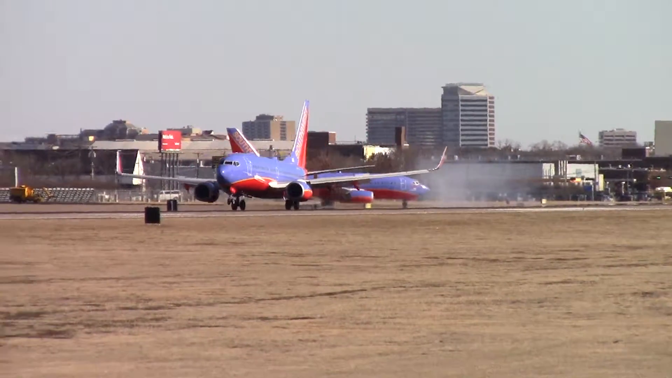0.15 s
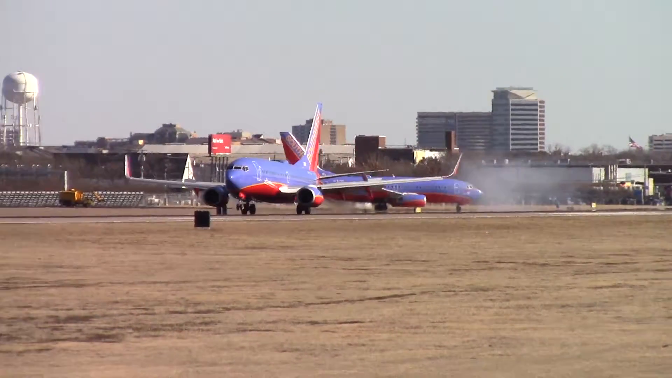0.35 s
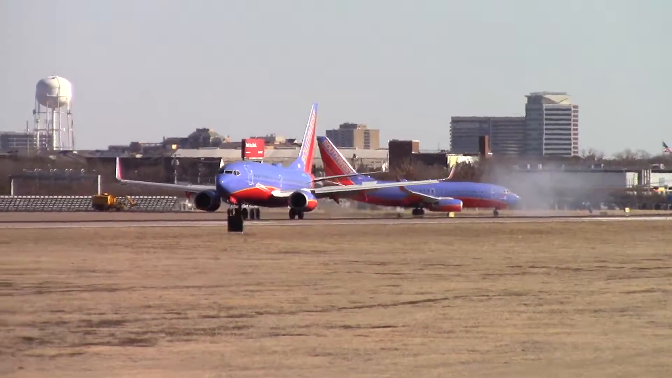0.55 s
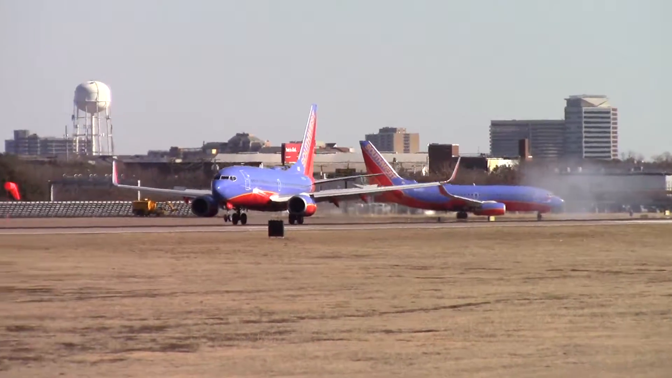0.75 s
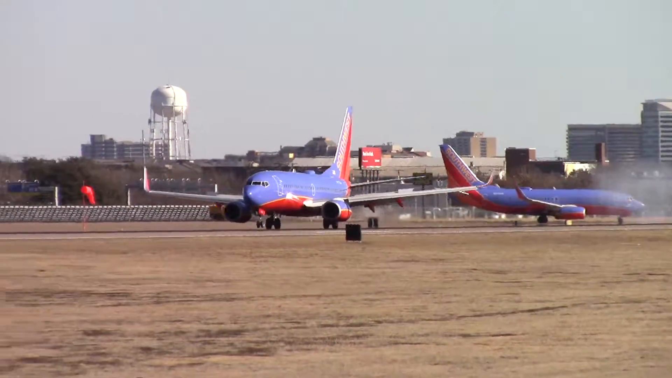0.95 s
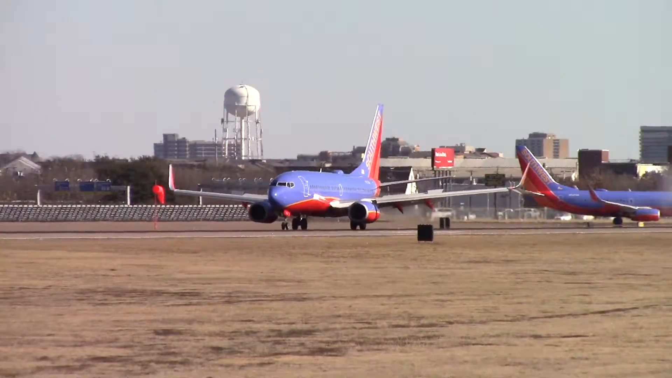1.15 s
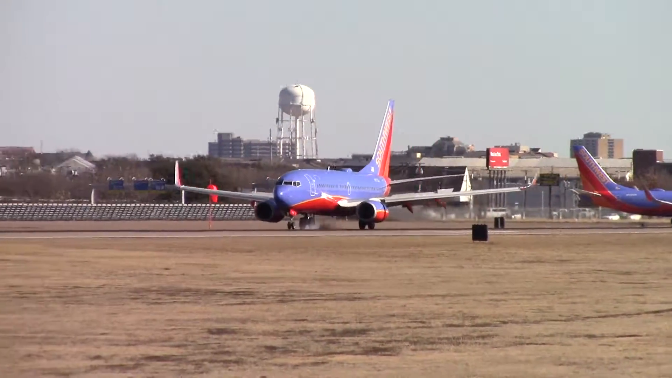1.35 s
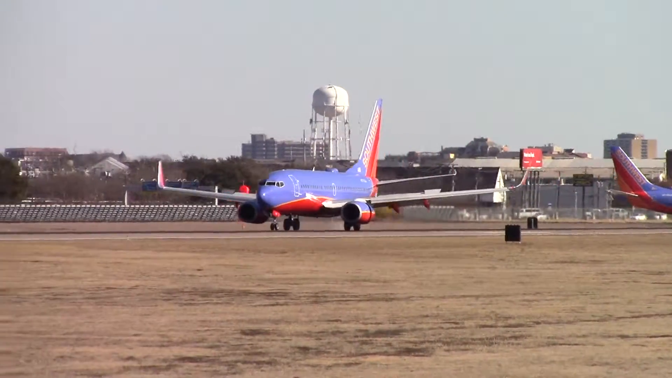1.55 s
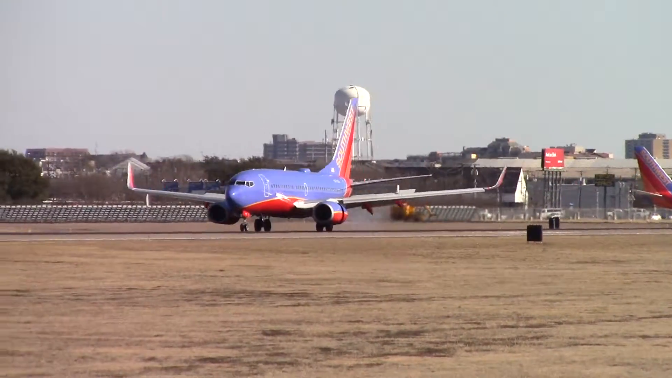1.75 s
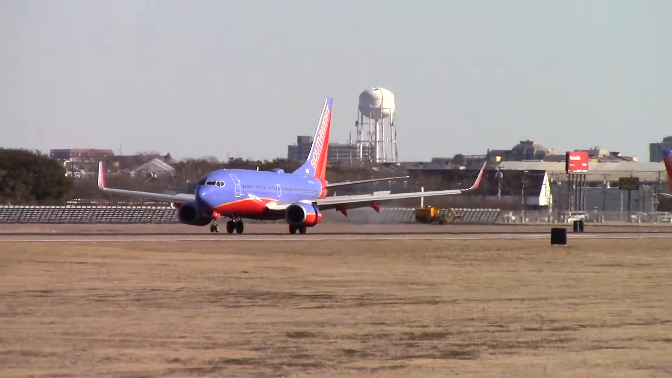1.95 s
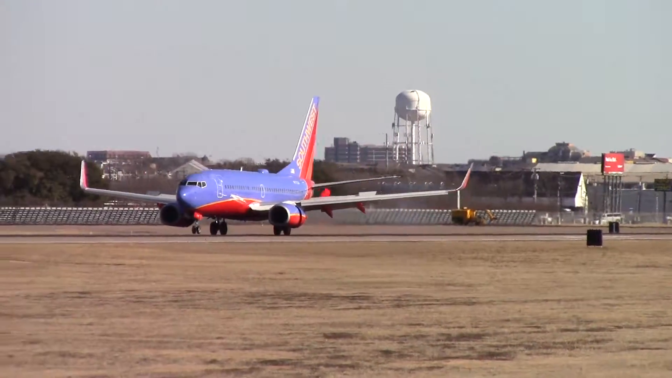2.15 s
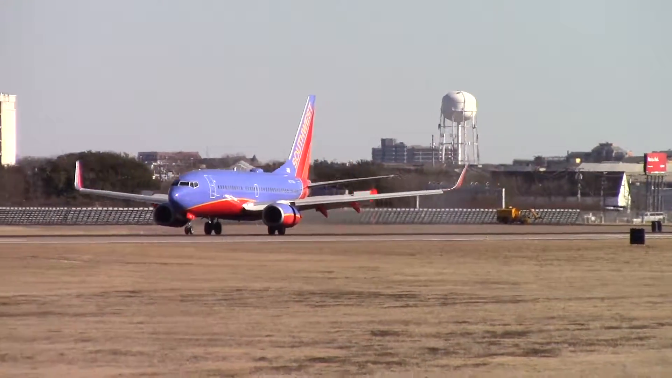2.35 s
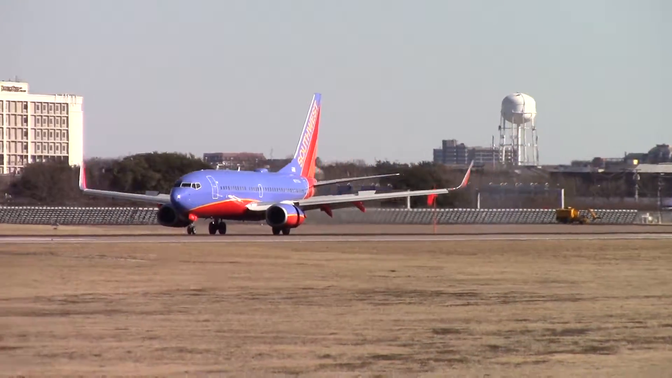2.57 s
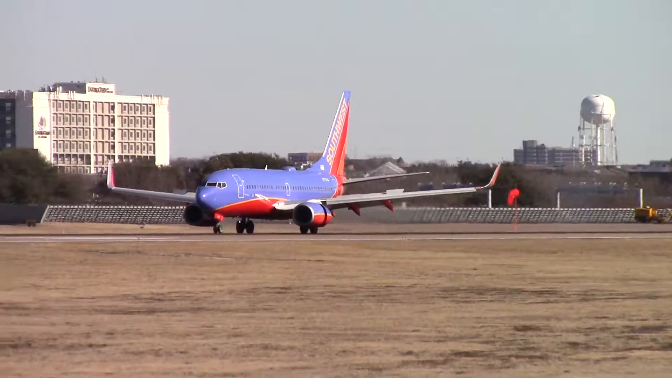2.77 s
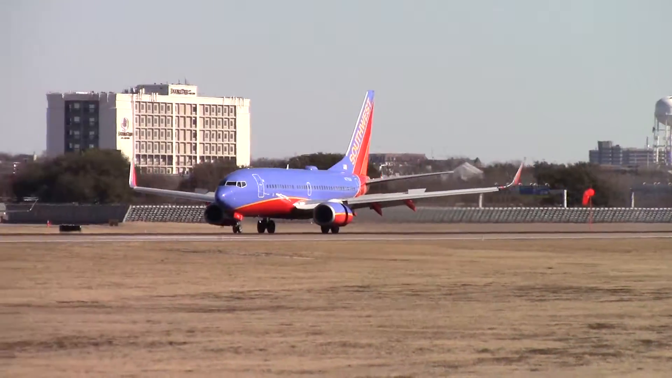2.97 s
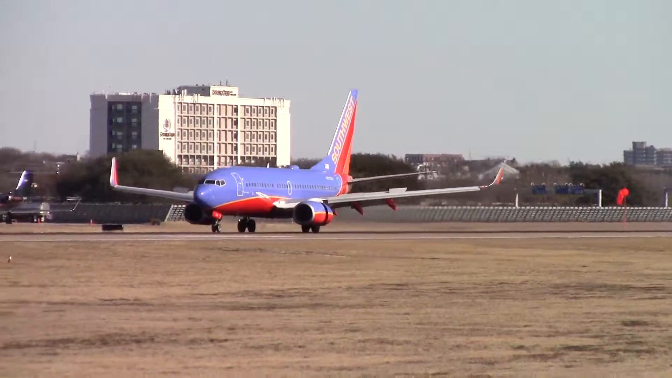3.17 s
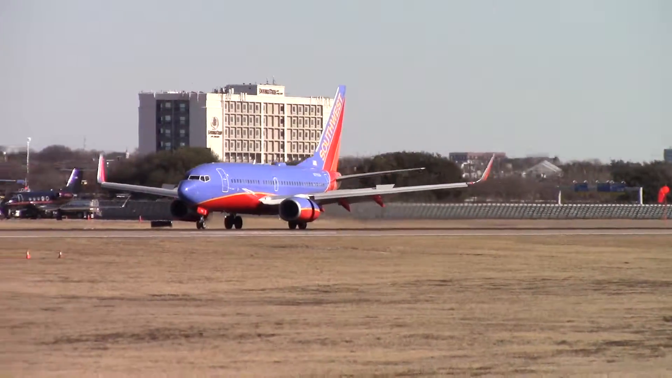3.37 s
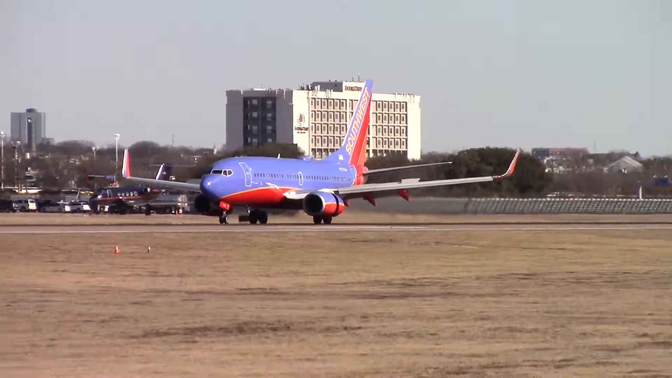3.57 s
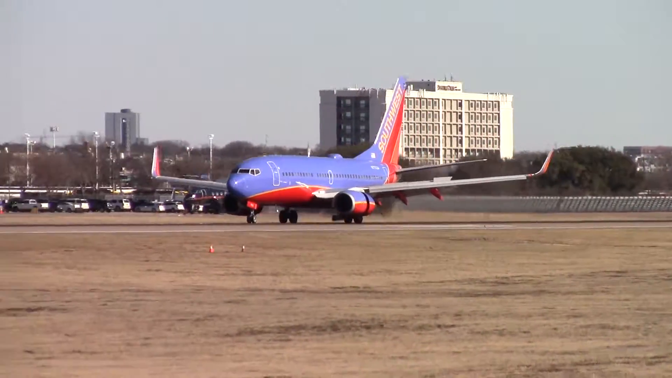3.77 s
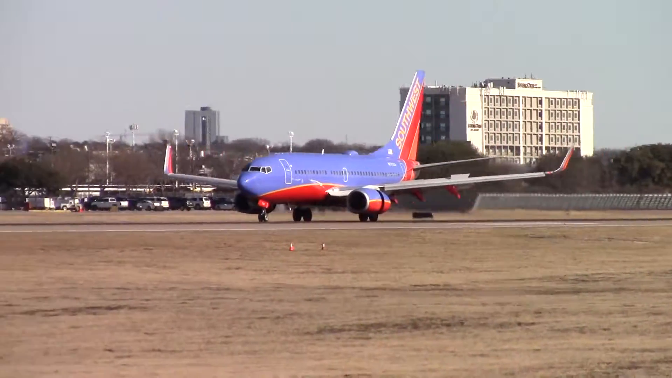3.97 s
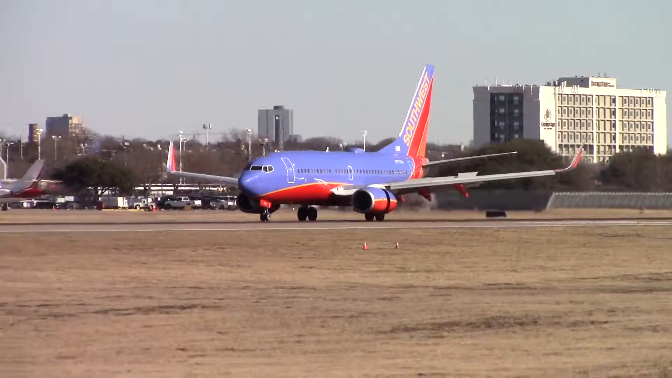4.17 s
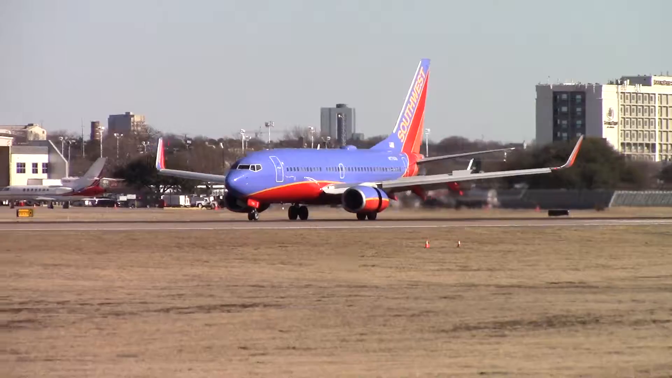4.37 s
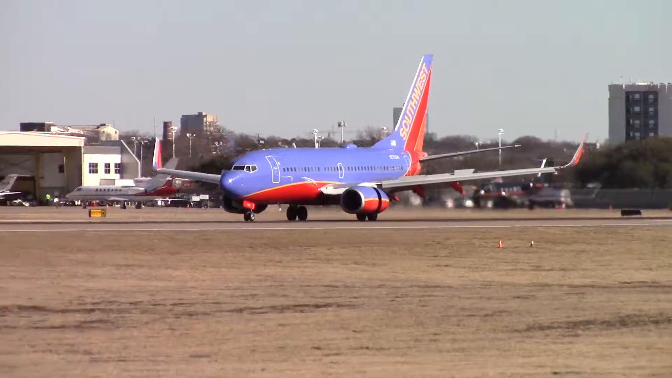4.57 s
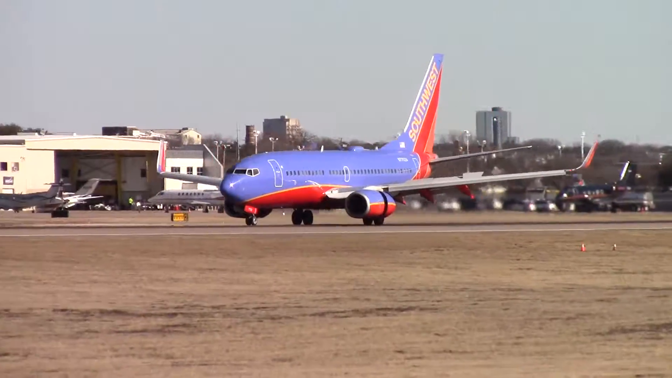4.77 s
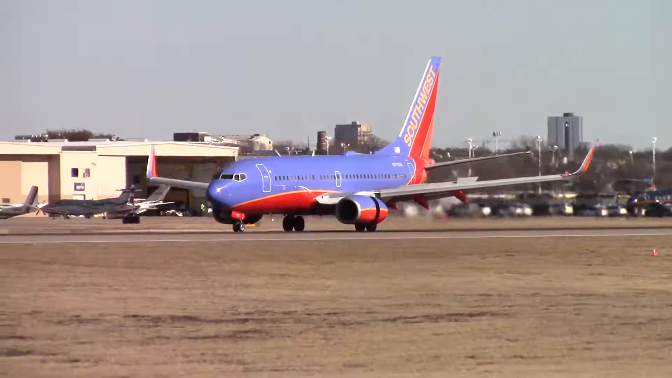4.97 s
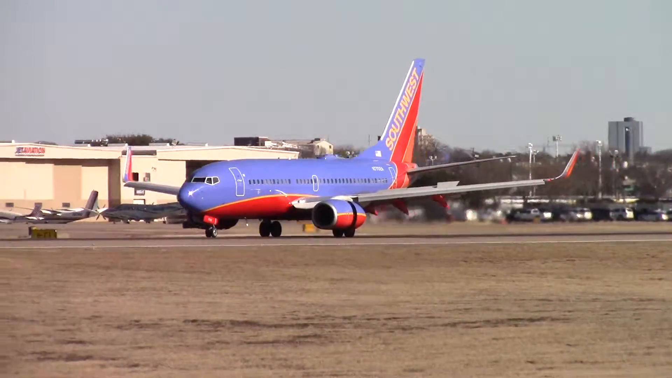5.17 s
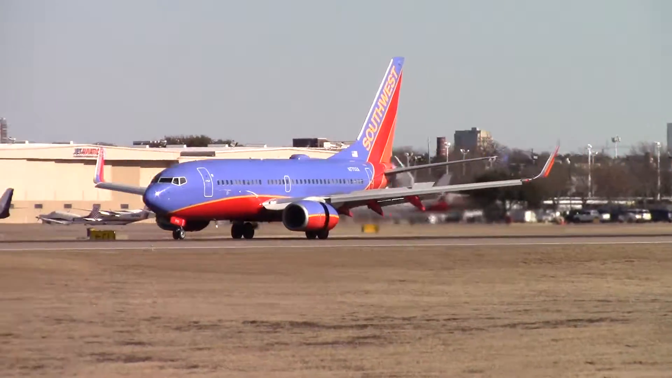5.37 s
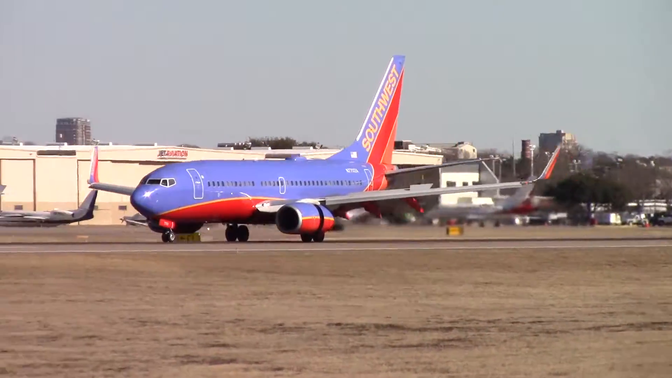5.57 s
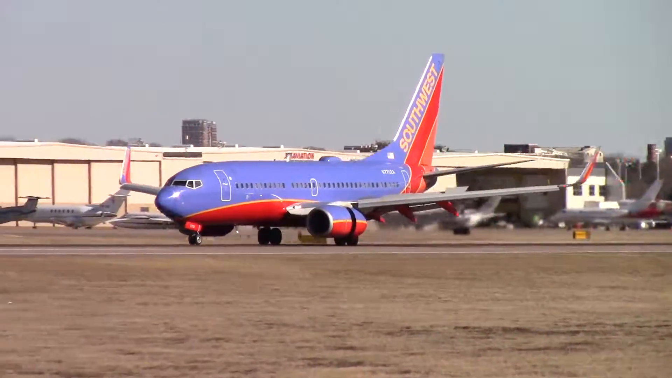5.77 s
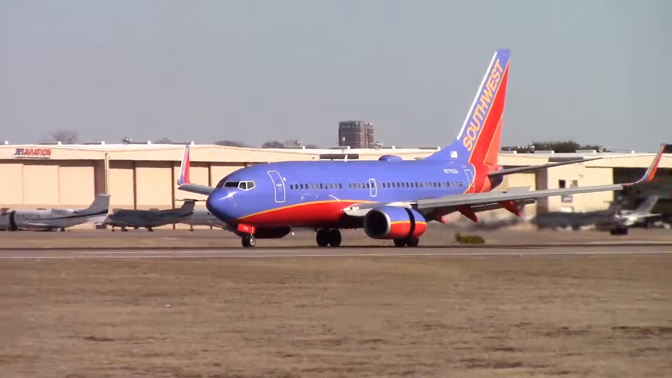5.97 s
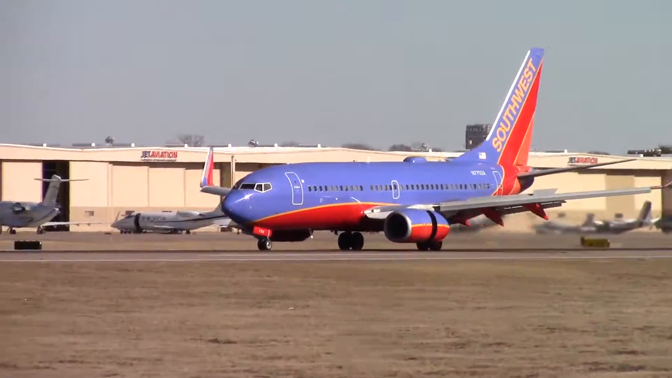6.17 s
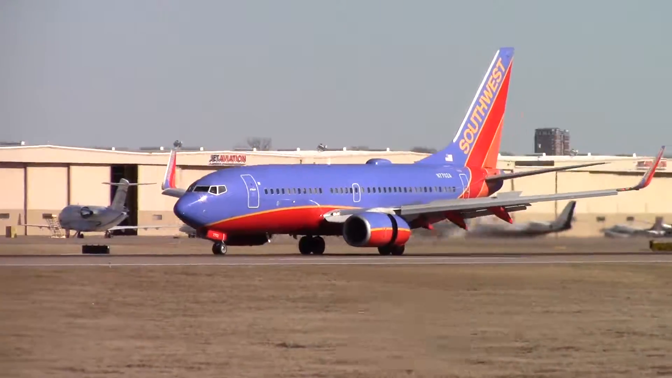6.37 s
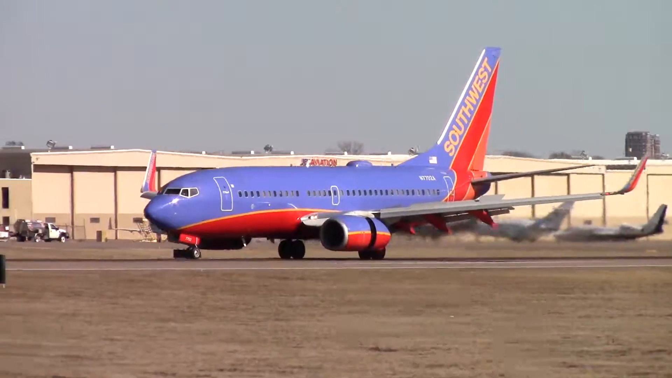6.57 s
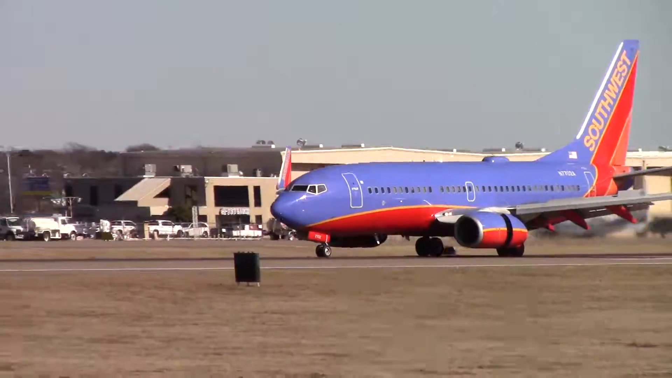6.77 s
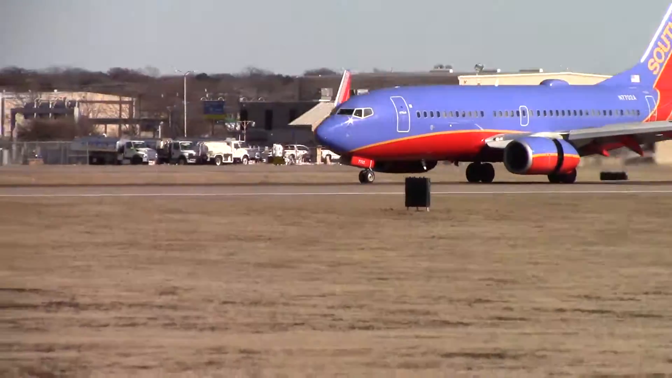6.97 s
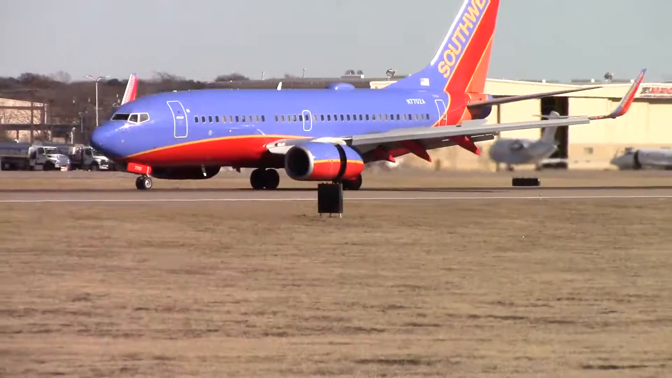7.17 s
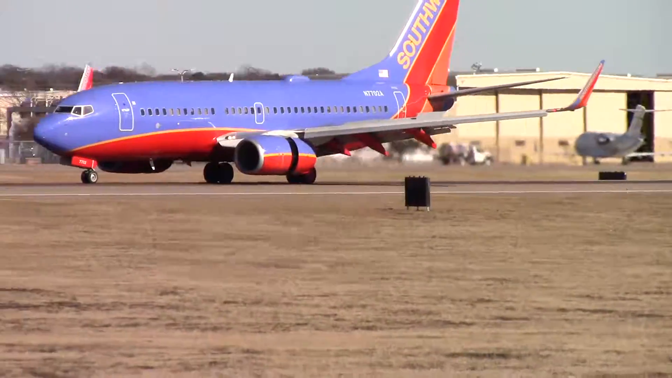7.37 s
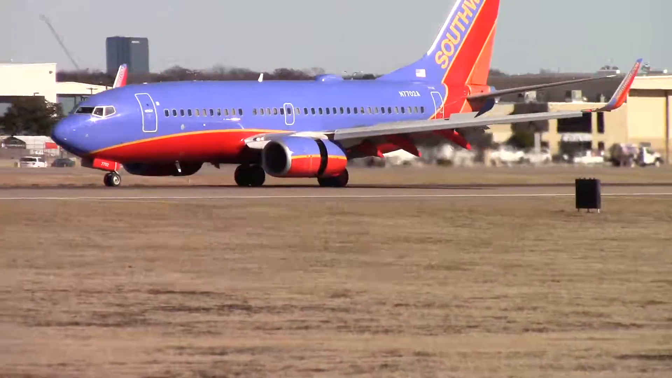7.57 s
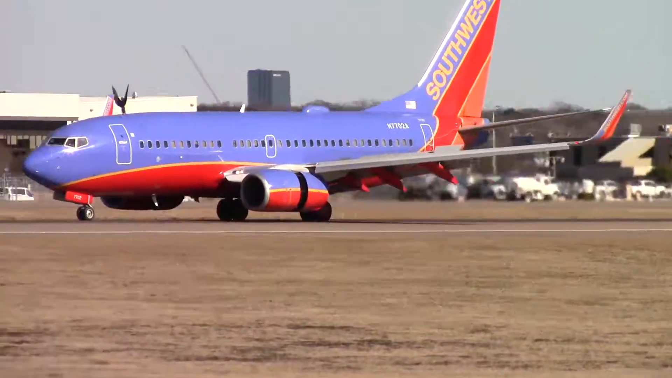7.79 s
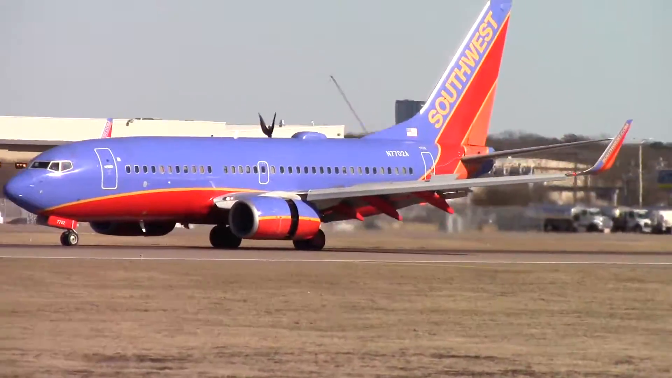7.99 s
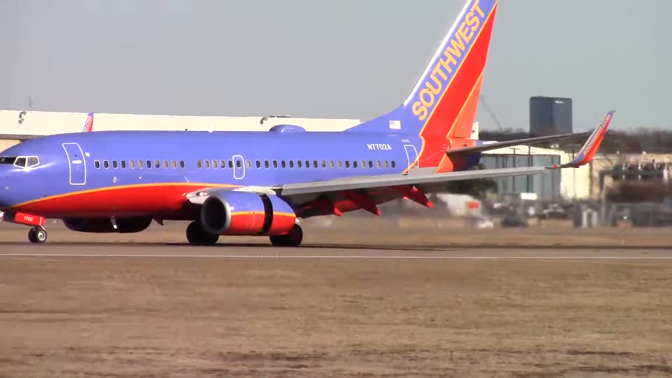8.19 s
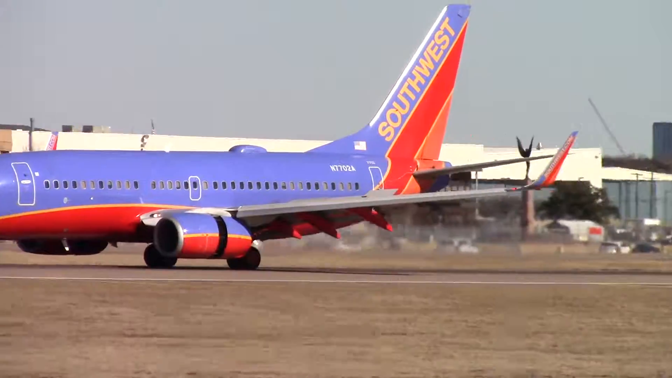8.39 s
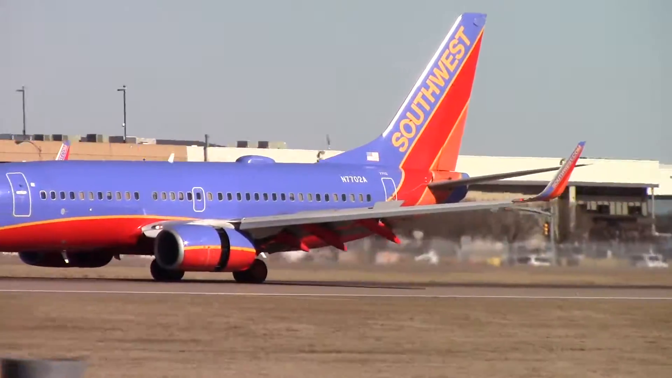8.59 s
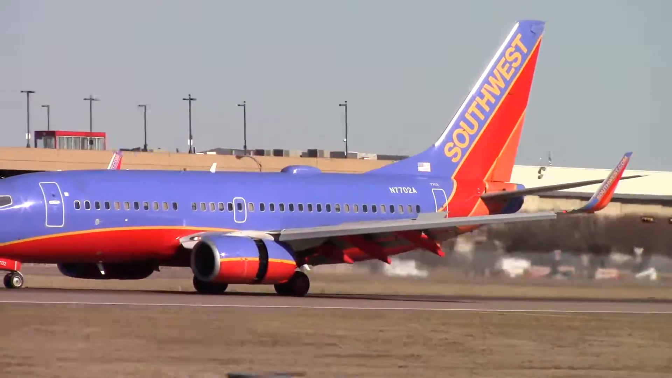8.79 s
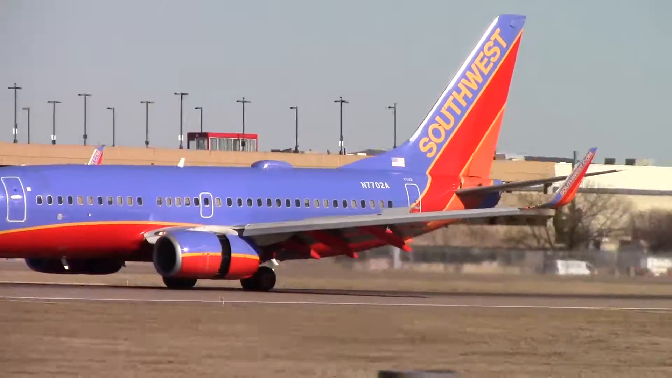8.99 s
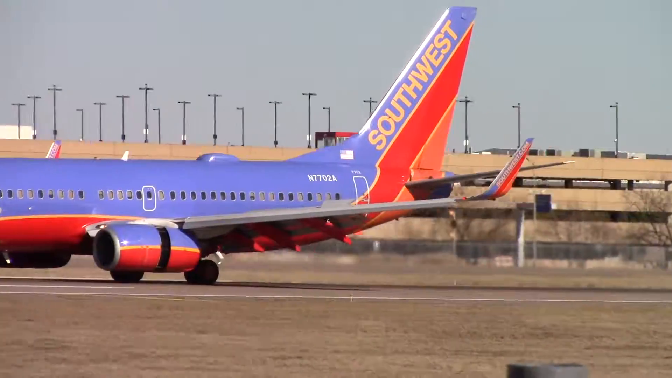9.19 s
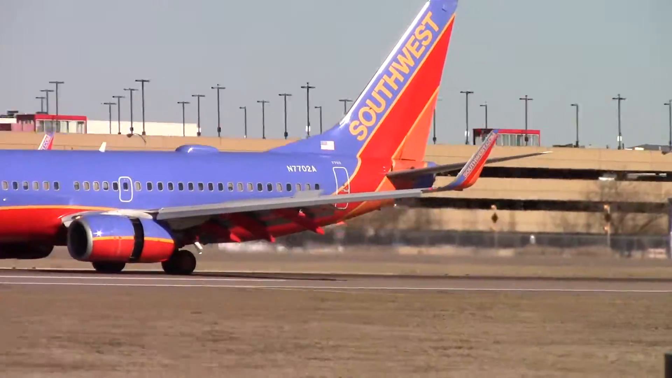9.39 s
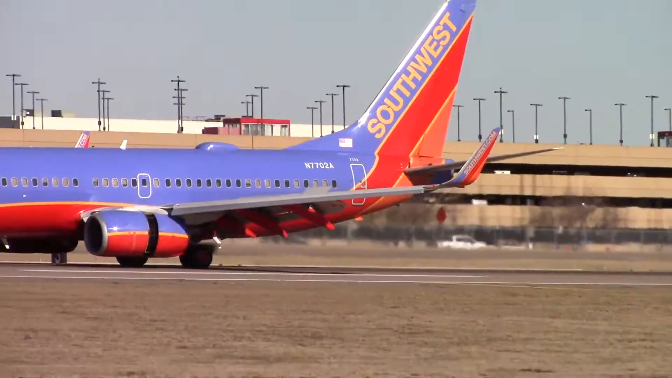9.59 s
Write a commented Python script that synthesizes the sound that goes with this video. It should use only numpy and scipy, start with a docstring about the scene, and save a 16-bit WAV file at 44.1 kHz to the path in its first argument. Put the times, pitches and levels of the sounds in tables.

```python
"""Jet landing roll with reverse thrust

A passenger jet rolls out along a runway and opens its thrust reversers, heard across a wide strip of grass.
Rumble, buffet, roar and rush are coloured noises that grow as the engines spool up and the jet nears.
Passing swells make them waver; nearness brings out the treble; the ground echo hollows them near 400 Hz.
At the microphone, a struck shell ticks and a noise burst brushes; far traffic hums over a faint hiss.
"""
import sys
import numpy as np
from scipy import signal
from scipy.fft import rfft, irfft, next_fast_len
from scipy.io import wavfile
from scipy.ndimage import uniform_filter1d, minimum_filter1d

SR = 44100
rng = np.random.default_rng(int(sys.argv[2]) if len(sys.argv) > 2 else 0)


def transcribe(signal):
    """Save signal, clipped to [-1, 1], as a 16-bit WAV file at the path in sys.argv[1]."""
    frames = np.atleast_2d(signal).T
    limited = np.clip(frames, -1, 1)
    pcm = np.round(limited * 32767).astype(np.int16)
    wavfile.write(sys.argv[1], SR, pcm)


N = 425124
TIME = np.arange(N) / SR
SIZE = next_fast_len(N, True)
FREQS = np.maximum(np.arange(SIZE // 2 + 1) * SR / SIZE, 1)


def from_db(db):
    """Decibels to gain."""
    return 10 ** (np.asarray(db) / 20)


def rms_one(x):
    """Scale to unit rms."""
    return x / np.sqrt(np.mean(x ** 2) + 1e-20)


def colour(points):
    """Gain at every frequency, falling 80 dB per octave beyond both ends."""
    hz, db = np.transpose(points)
    octaves_out = np.abs(np.log2(FREQS / np.clip(FREQS, hz[0], hz[-1])))
    return from_db(np.interp(np.log(FREQS), np.log(hz), db) - 80 * octaves_out)


def drift(rate_hz):
    """Slow random curve of rms 1 that changes about rate_hz times a second."""
    step = 40  # samples between random draws
    pole = np.exp(-2 * step * np.pi * rate_hz / SR)
    draws = rng.standard_normal(N // step + 2002)
    slow = signal.lfilter([1], [1, -2 * pole, pole * pole], draws)[2000:]  # skip the filter's start
    return np.interp(np.arange(N) / step, np.arange(len(slow)), rms_one(slow))


def shaped(x, gains):
    """Filter by a gain at every frequency."""
    return irfft(rfft(x, SIZE) * gains, SIZE)[:N]


def noise(spectrum):
    """Steady noise of a given colour, rms 1."""
    return rms_one(shaped(rng.standard_normal(N), colour(spectrum)))


def blurred_tone(hz, width_hz):
    """Noise gathered in one resonance, rms 1."""
    resonance = 1 / (1 + ((FREQS - hz) / width_hz) ** 2)
    return rms_one(shaped(rng.standard_normal(N), resonance))


def eddies(spectrum, flutter_db, flutter_hz):
    """Turbulent noise: power evened over a quarter second, then a quick flutter; rms 1."""
    x = noise(spectrum)
    power = uniform_filter1d(x ** 2, size=SR // 4)
    flutter = from_db(flutter_db * drift(flutter_hz))
    return rms_one(x / np.sqrt(power + 1e-9) * flutter)


def bump(centre_s, length_s):
    """A smooth rise to 1 and fall, centred on a moment."""
    return np.exp(-(2 * (TIME - centre_s) / length_s) ** 2)


# larger exhaust eddies, relative density: (frequency [Hz], density [dB])
RUMBLE_COLOUR = [(20, -37.5), (32, -36.5), (45, -30), (60, -19), (78, -11), (100, -4.5), (130, -3),
                 (160, -1), (190, 0), (228, -1.5)]
BUFFET_COLOUR = [(235, 0.5), (270, -0.5), (310, -1), (360, -5.5), (420, -14)]
FULL_THRUST_S = 5.093  # spool-up ends, thrust then holds


def jet(distance_m, levels_db, swells_db, deep_hz=110, deep_db_per_s=3.5, deep_most_db=6):
    """Large eddies rumble below the ground-echo dip; smaller ones buffet, roar and rush."""
    rumble_db, buffet_db, roar_db, rush_db = levels_db + swells_db
    # at part thrust the slower exhaust rumbles deeper
    large = eddies(RUMBLE_COLOUR, flutter_db=0.5, flutter_hz=13)
    deep = shaped(large, 1 / (1 + (FREQS / deep_hz) ** 6))
    deepen_db = np.clip(deep_db_per_s * (FULL_THRUST_S - TIME), 0, deep_most_db)
    rumble = from_db(rumble_db) * (large + (from_db(deepen_db) - 1) * deep)
    buffet = from_db(buffet_db) * eddies(BUFFET_COLOUR, flutter_db=0.75, flutter_hz=8.7)
    roar = from_db(roar_db) * howling_roar()
    fine = from_db(rush_db) * rush(distance_m, swells_db[-1])
    return rumble + ground_dip(buffet + roar, distance_m) + fine


# reversed exhaust; rows rumble, buffet, roar, rush:
# (centre [Hz], full-thrust level at closest point before side loss [dB], spool-up rise [dB/s],
#  loss once the forward-thrown exhaust is heard from the side [dB])
EXHAUST_PARTS = [(160, -8.5, 10, 4), (290, -10, 16.5, 4.5), (630, -10.5, 11.5, 3), (1500, -17, 11, -1.7)]
SPEED_M_PER_S, ABEAM_S, CLOSEST_M = 70, 9.62, 157


def roll_past():
    """Straight pass: distance, part levels from thrust, spreading and side shown, and swells."""
    hz, full_db, rise_db_per_s, side_loss_db = np.transpose(EXHAUST_PARTS)[:, :, None]
    distance_m = np.hypot(CLOSEST_M, SPEED_M_PER_S * (ABEAM_S - TIME))
    nearness = CLOSEST_M / distance_m
    side_on = nearness ** 4
    to_full_s = np.maximum(FULL_THRUST_S - TIME, 0)
    thrust_db = full_db - rise_db_per_s * to_full_s
    levels_db = thrust_db + 20 * np.log10(nearness) - side_loss_db * side_on
    return distance_m, levels_db, swells(hz)


# passing swells and fades: (centre time [s], length [s], peak change [dB], centre frequency [Hz])
SWELLS = [(4.46, 0.48, -3, 620), (5.25, 1.3, -3.5, 1300), (5.349, 1.01, -9.5, 304), (4.95, 0.49, 2.5, 763),
          (6.048, 0.55, 2.5, 1100), (6.15, .55, 5, 251), (6.278, .2, -2.5, 600), (6.501, .2, 2, 620),
          (6.687, .25, -2, 160), (6.698, .5, -2.2, 1500), (7.052, 0.17, 3, 310), (7.6, .45, -3.5, 730),
          (7.95, .35, 2.5, 900), (8.52, .3, -1.8, 1500), (8.571, 0.57, -4.5, 600), (9.13, 0.23, 3.2, 1500),
          (9.27, 0.63, -7.5, 280), (9.363, .18, -1.5, 1500), (9.4, 0.22, 6.5, 630)]
SWELL_WIDTH_OCTAVES = 0.84


def swells(hz):
    """Passing level changes in dB, one row per frequency, each strongest near its centre frequency."""
    total_db = 0
    for centre_s, length_s, db, centre_hz in SWELLS:
        reach = np.exp(-(np.log2(hz / centre_hz) / SWELL_WIDTH_OCTAVES) ** 2)
        total_db = total_db + np.outer(db * reach, bump(centre_s, length_s))
    return total_db


# mid-size exhaust eddies, relative density: (frequency [Hz], density [dB])
ROAR_COLOUR = [(410, -8.5), (470, -4), (560, 0), (630, -.5), (720, 0), (840, -3), (1000, -12.5)]
# howls within the roar: (centre time [s], length [s], peak share of roar power [0-1], pitch [Hz])
HOWLS = [(5.001, .65, .42, 674), (6.523, .24, .38, 590), (8.72, .55, .25, 832), (9.402, 0.2, .7, 600)]


def howling_roar(howl_width_hz=78):
    """Broad turbulence that at moments hands part of its power to a narrow, throaty howl."""
    howls, howl_share = np.zeros(N), np.zeros(N)
    for centre_s, length_s, peak_share, hz in HOWLS:
        share = peak_share * bump(centre_s, length_s)
        howls += np.sqrt(share) * blurred_tone(hz, howl_width_hz)
        howl_share += share
    broad = eddies(ROAR_COLOUR, flutter_db=1.08, flutter_hz=7.6)
    return howls + np.sqrt(np.maximum(1 - howl_share, 0)) * broad


# fine exhaust turbulence at NEAR_M, relative density: (frequency [Hz], density [dB])
RUSH_COLOUR = [(1000, -3.0), (1250, 0.0), (1600, -4), (2200, -8.5), (2700, -10.5), (3300, -17), (3900, -26),
               (4700, -32.5), (5300, -42), (6300, -46.5), (7500, -55), (9000, -65), (12000, -74)]
NEAR_M = 169.6
AIR_DB_PER_M, AIR_POWER = 0.0066, 1.623  # loss at 1 kHz, exponent of its growth with frequency


def rush(distance_m, swell_db, brightens=0.46, shocks_per_s=260, crackle=0.43, shock_spread_db=3.5,
         shimmer_db=0.47, gust_db=0.33):
    """Fine turbulence and shocks; air takes treble with distance and bands shimmer; swells brighten."""
    hits = rng.random(N) < shocks_per_s / SR
    shocks = hits * from_db(shock_spread_db * np.minimum(rng.exponential(1, N), 4))
    source = rfft(rng.standard_normal(N) + crackle * rms_one(shocks), SIZE) * colour(RUSH_COLOUR)
    source /= np.std(irfft(source, SIZE))
    gust, out = gust_db * drift(9.4), np.zeros(N)
    for centre_hz in 1000 * 2 ** (np.arange(-2, 12) / 3):  # overlapping third-octave bands
        share = np.maximum(1 - 3 * np.abs(np.log2(FREQS / centre_hz)), 0)
        khz = centre_hz / 1000
        # loss relative to about 1.5 kHz; the overall level already follows thrust, distance and swells
        air_db = AIR_DB_PER_M * (khz ** AIR_POWER - 2) * (distance_m - NEAR_M)
        bright_db = brightens * swell_db * np.log(khz / 2)
        waver_db = np.sqrt(khz) * (gust + shimmer_db * drift(8.1))
        out += irfft(source * share, SIZE)[:N] * from_db(waver_db + bright_db - air_db)
    return out


def ground_dip(x, distance_m, dip_hz=385, sharpness=3.4, full_depth_m=520):
    """The ground echo cancels one band, more fully the farther and flatter the path, up to 80 %."""
    band = signal.lfilter(*signal.iirpeak(dip_hz, sharpness, fs=SR), x)
    depth = np.clip((distance_m - NEAR_M) / (full_depth_m - NEAR_M), 0, 0.8)
    return x - depth * band


# ticks close to the microphone: (time [s], strike level [dB], high-pass cutoff [Hz])
TICKS = [(0.4444, -12, 1750), (2.134, -45, 2400), (2.2850, -38, 2000), (3.427, -28, 2500),
         (3.6080, -41, 2400), (4.0776, -28.5, 2700), (6.9951, -14.5, 4400), (7.1922, -15, 3000),
         (8.5905, -29, 5500), (9.4021, -20, 8500)]
# modes of the small plastic body that ticks: (frequency [Hz], level [dB], 60 dB decay time [s])
SHELL_MODES = [(2000, -3.5, 0.014), (2400, -4.5, 0.0098), (3110, -7.5, 0.0073), (4020, -6.5, 0.0053),
               (5800, -10, 0.0035), (8370, -21.5, 0.0042), (10250, -28, 0.0064), (11250, -30, 0.0059),
               (13400, -30, .003)]


def ticks(chatter=0.082, chatter_s=0.0016):
    """A snap with brief chatter rings the shell's modes; a high-pass thins each tick."""
    t, out = np.arange(SR // 20) / SR, np.zeros(N)
    ring = np.zeros(len(t))
    for k, (hz, db, t60_s) in enumerate(SHELL_MODES):
        ring += (-1) ** k * from_db(db - 60 * t / t60_s) * np.sin(2 * np.pi * hz * t)
    for s, db, low_hz in TICKS:
        contact = (t == 0) + chatter * rng.standard_normal(len(t)) * np.exp(-t / chatter_s)
        tick = signal.fftconvolve(contact, ring)[:len(t)]
        highpass = signal.butter(4, low_hz, "high", fs=SR, output="sos")
        at = round(s * SR)
        out[at:at + len(t)] += from_db(db) * signal.sosfilt(highpass, tick)
    return out


# brushing touch, relative density: (frequency [Hz], density [dB])
BRUSH_COLOUR = [(3500, -5), (4500, 2), (6500, -2.5), (8700, -4), (10000, -13.5), (12000, -15.5),
                (15500, -22.5)]
BRUSH_START_S, BRUSH_DB, BRUSH_ATTACK_S = 6.994, -51.5, 0.003
BRUSH_HOLD_S, BRUSH_FADE_DB_PER_S = 0.04, 140.5  # hold counts from the start


def brush(grain_db=2.5):
    """A short, bright rub at the microphone: noise that dies away unevenly."""
    age_s = TIME - BRUSH_START_S
    attack = np.clip(age_s / BRUSH_ATTACK_S, 0, 1)
    fade_db = BRUSH_FADE_DB_PER_S * np.maximum(age_s - BRUSH_HOLD_S, 0)
    level_db = BRUSH_DB - fade_db + grain_db * drift(90)
    return attack * from_db(level_db) * noise(BRUSH_COLOUR)


# far traffic and airport noise, relative density: (frequency [Hz], density [dB])
TRAFFIC_COLOUR = [(22, -35.5), (40, -24), (65, -4.5), (100, 0.5), (140, -1), (200, -4.5), (290, -3),
                  (550, -2), (850, -5), (1200, -10), (1700, -18.5), (2300, -26), (3000, -34), (3600, -42)]
TRAFFIC_DB = -34.5
# distant engine drones: (frequency [Hz], level before the common drone_db trim [dB])
DRONES = [(143, -51), (241, -48), (352, -47), (528, -54.5), (807, -51.5), (1198, -56.5)]


def traffic(drone_width_hz=3.5, drone_db=-1):
    """A smooth distant wash of noise with a few blurred engine drones."""
    out = from_db(TRAFFIC_DB) * eddies(TRAFFIC_COLOUR, flutter_db=0.32, flutter_hz=5)
    for hz, db in DRONES:
        out += from_db(db + drone_db) * blurred_tone(hz, drone_width_hz)
    return out


# microphone hiss, relative density: (frequency [Hz], density [dB])
HISS_COLOUR = [(3600, -0.5), (4500, -3.0), (6000, -5.5), (8000, -7.5), (11000, -12), (15300, -19.5)]
HISS_DB = -68


def hiss():
    """Steady microphone self-noise."""
    return from_db(HISS_DB) * noise(HISS_COLOUR)


# side filters for the jet and the traffic: (frequency [Hz], side re mid [dB])
JET_WIDTH = [(25, -22.5), (200, -38), (400, -27.5), (570, -36), (900, -26.5), (1300, -30), (2500, -29.5),
             (4000, -29.5), (8000, -14), (15000, -18)]
TRAFFIC_WIDTH = [(25, -19), (90, -37.5), (300, -27.5), (1000, -21.5), (2000, -18), (3600, -8.5)]
# extra side bass of the jet: (time [s], level [dB])
BASS_SPREAD = [(3.0, -30.5), (6.9, -41), (7.6, -20), (9.64, -21.5)]


def scene(bass_left=0.028, hiss_side=0.26, bass_hz=430):
    """Two close capsules hear nearly one field; bass leans left, its spread varying with time."""
    lowpass = signal.butter(2, bass_hz, fs=SR, output="sos")
    lowpass = np.vstack([lowpass, lowpass])
    passing = roll_past()
    mid = jet(*passing) + ticks() + brush() + traffic() + hiss()
    scattered = jet(*passing)  # from other directions, unrelated to the direct sound
    side = shaped(scattered, colour(JET_WIDTH)) + shaped(traffic(), colour(TRAFFIC_WIDTH))
    spread_db = np.interp(TIME, *np.transpose(BASS_SPREAD))
    side += from_db(spread_db) * signal.sosfilt(lowpass, scattered)
    side += bass_left * signal.sosfiltfilt(lowpass, mid)
    side += hiss_side * hiss()
    return np.array([mid + side, mid - side])


LIMIT, CUTOFF_HZ = 0.97, 15700


def record(dry):
    """A fast look-ahead limiter holds the peaks; a steep low-pass cuts the top."""
    hold = SR // 150
    peak = np.abs(dry).max(axis=0)
    gain = minimum_filter1d(np.minimum(1, LIMIT / (peak + 1e-9)), size=2 * hold)
    gain = uniform_filter1d(uniform_filter1d(gain, size=hold), size=hold)
    lowpass = signal.ellip(10, 0.1, 80, CUTOFF_HZ, fs=SR, output="sos")
    return signal.sosfilt(lowpass, dry * gain)


dry = scene()
out = record(dry)
transcribe(out)
```